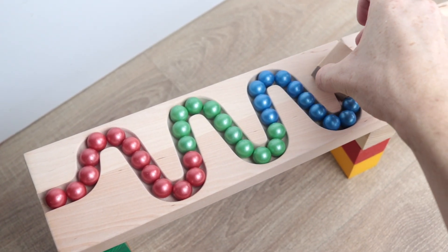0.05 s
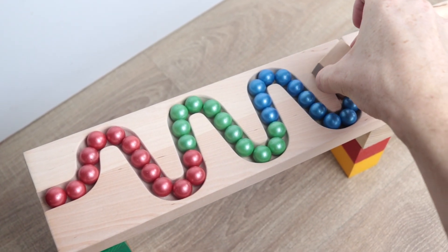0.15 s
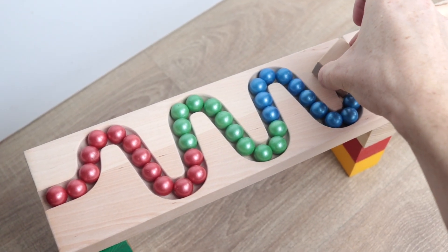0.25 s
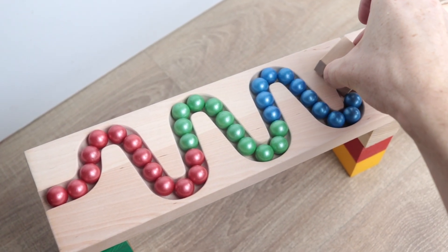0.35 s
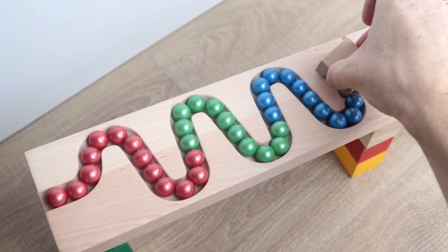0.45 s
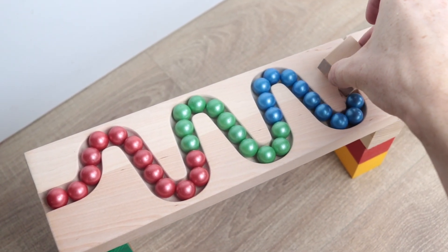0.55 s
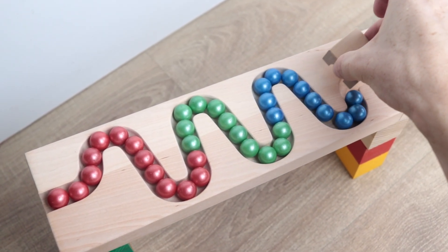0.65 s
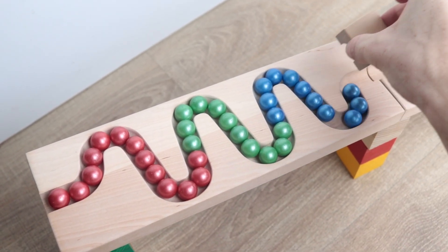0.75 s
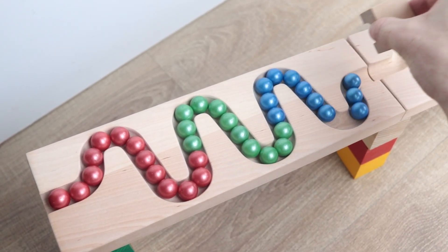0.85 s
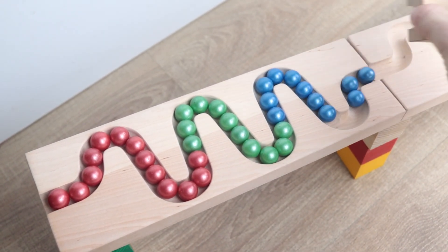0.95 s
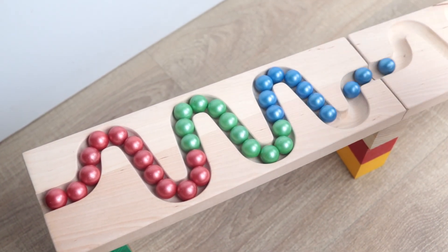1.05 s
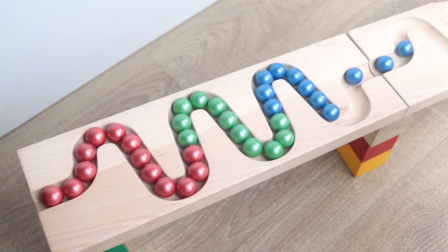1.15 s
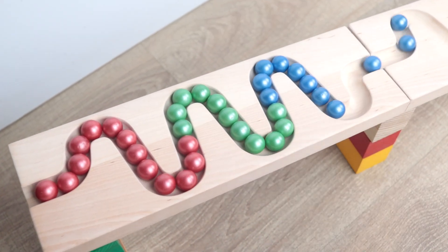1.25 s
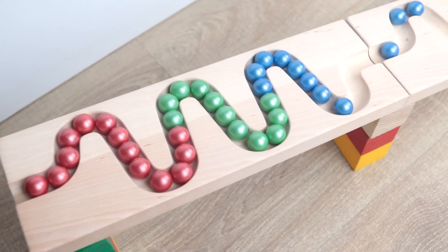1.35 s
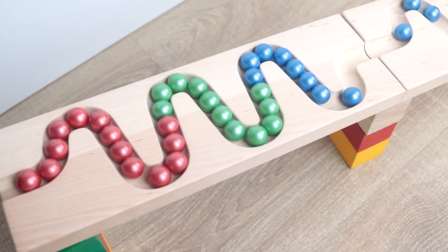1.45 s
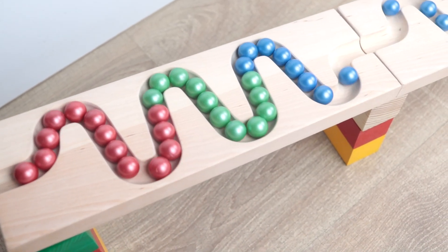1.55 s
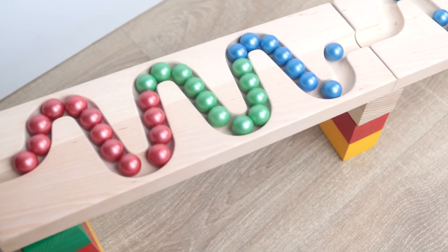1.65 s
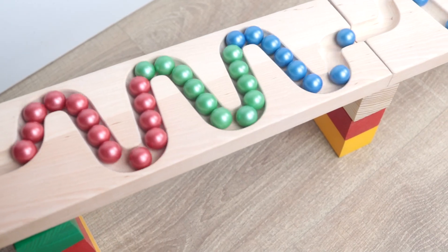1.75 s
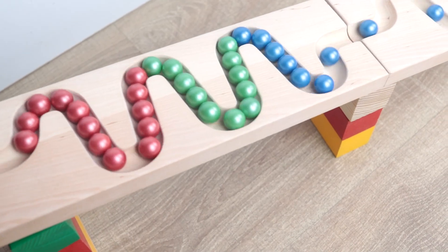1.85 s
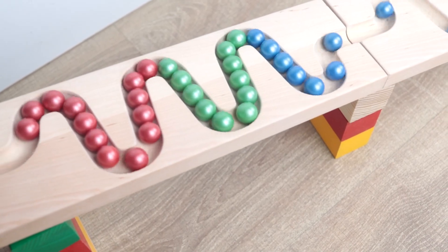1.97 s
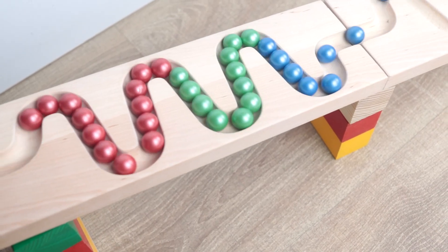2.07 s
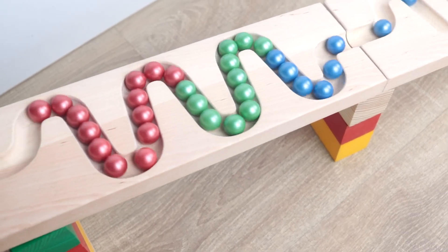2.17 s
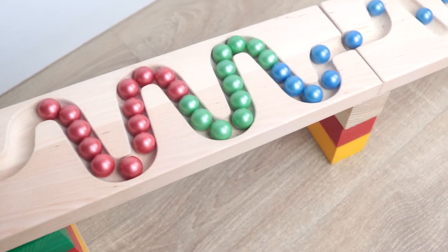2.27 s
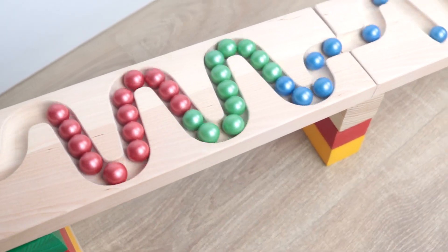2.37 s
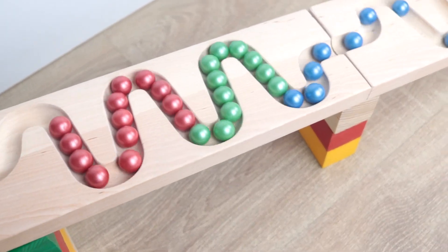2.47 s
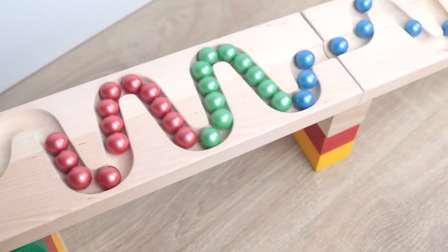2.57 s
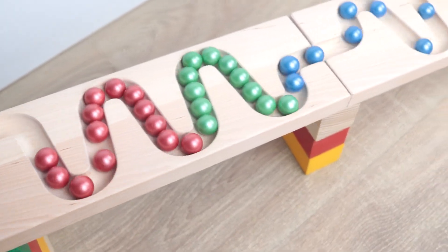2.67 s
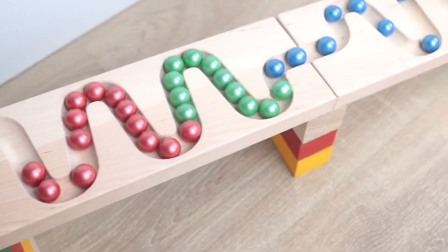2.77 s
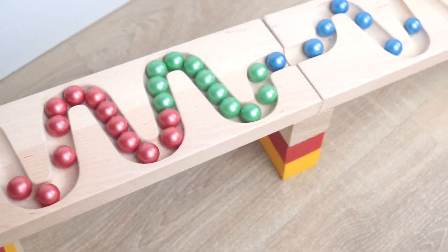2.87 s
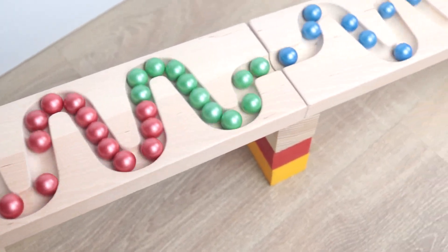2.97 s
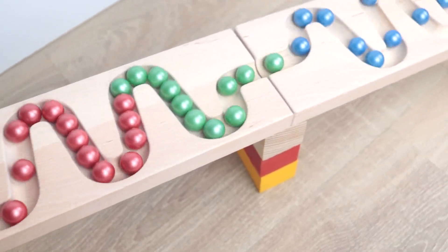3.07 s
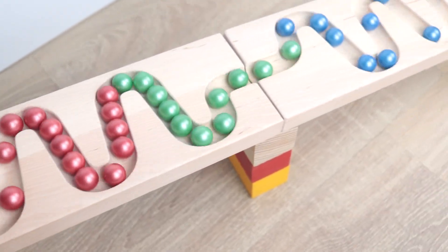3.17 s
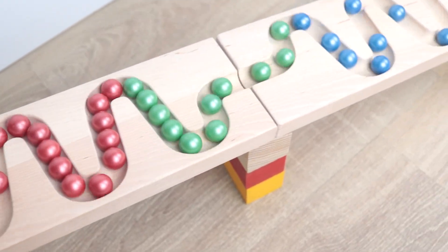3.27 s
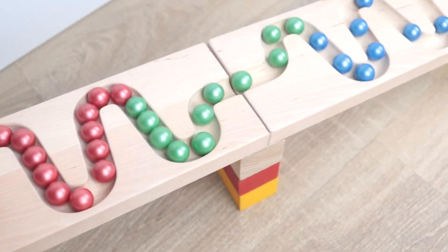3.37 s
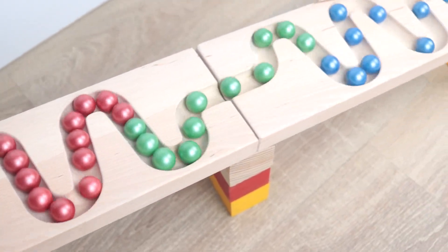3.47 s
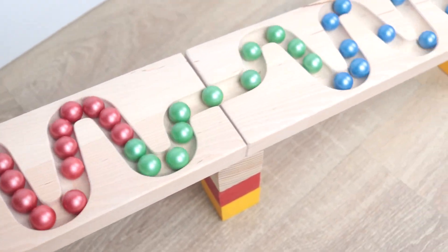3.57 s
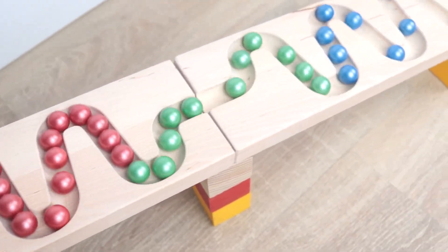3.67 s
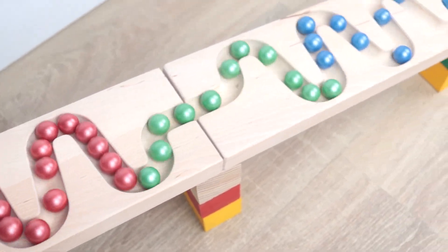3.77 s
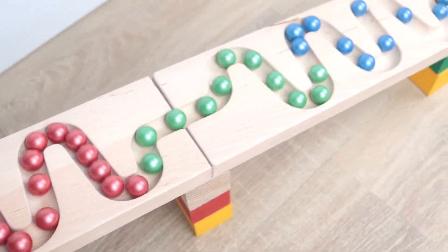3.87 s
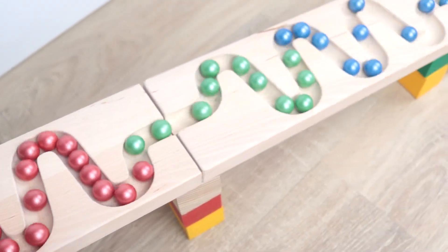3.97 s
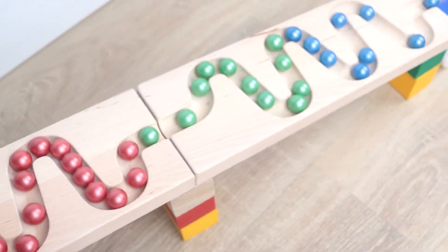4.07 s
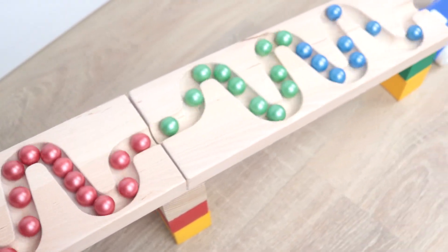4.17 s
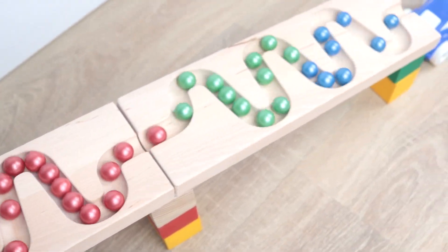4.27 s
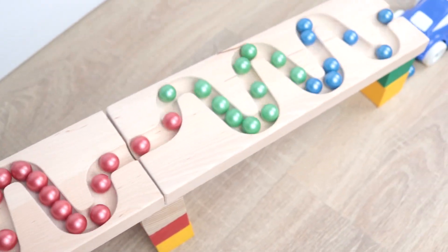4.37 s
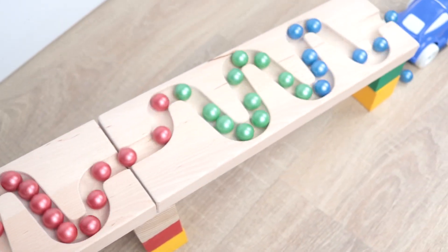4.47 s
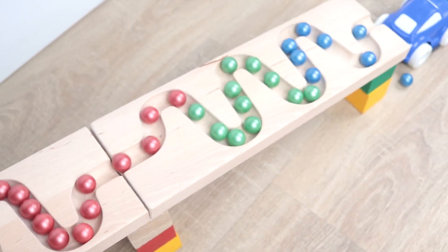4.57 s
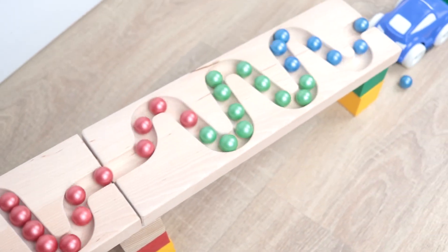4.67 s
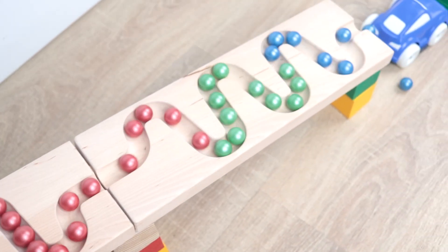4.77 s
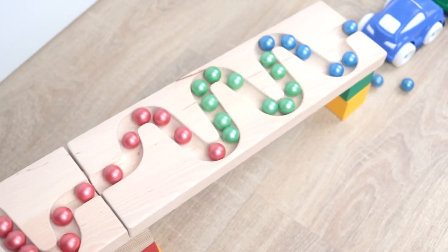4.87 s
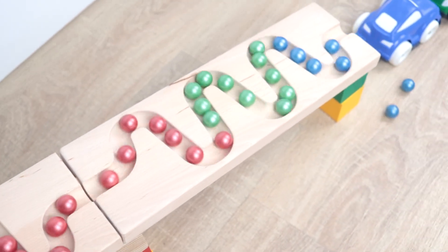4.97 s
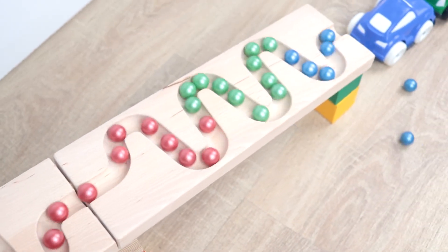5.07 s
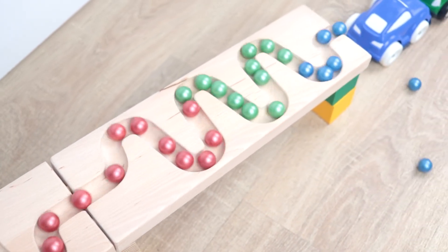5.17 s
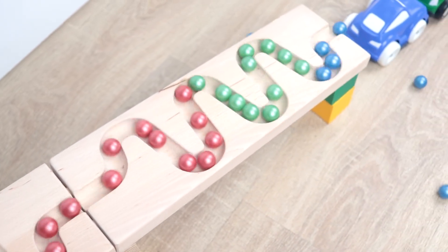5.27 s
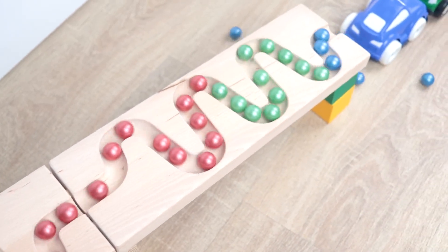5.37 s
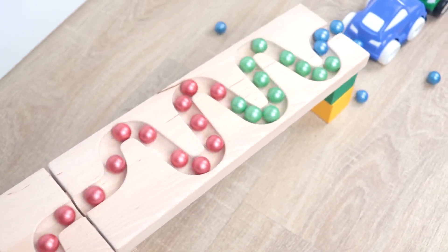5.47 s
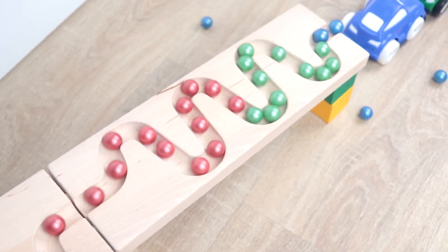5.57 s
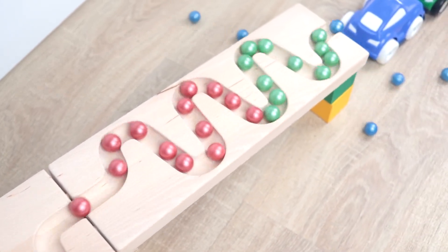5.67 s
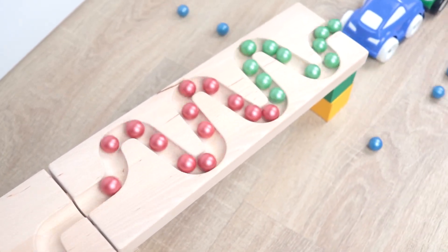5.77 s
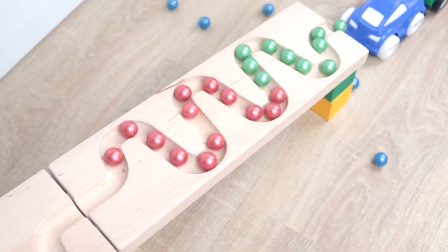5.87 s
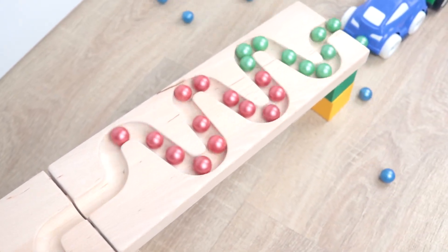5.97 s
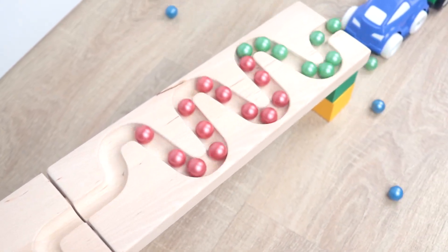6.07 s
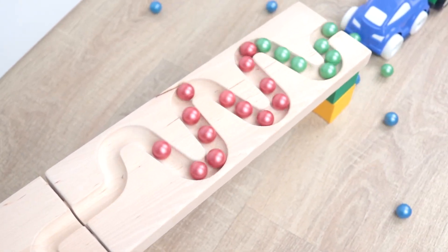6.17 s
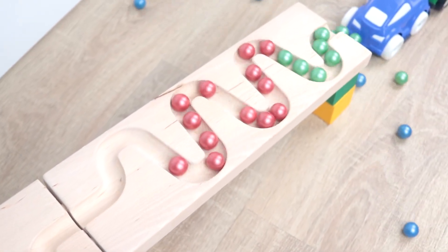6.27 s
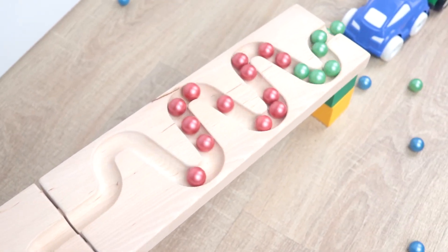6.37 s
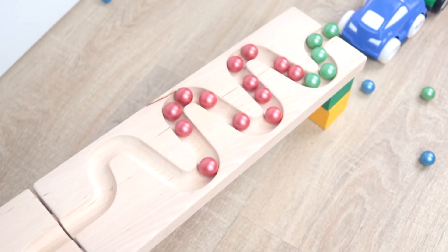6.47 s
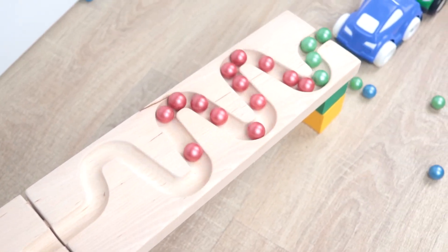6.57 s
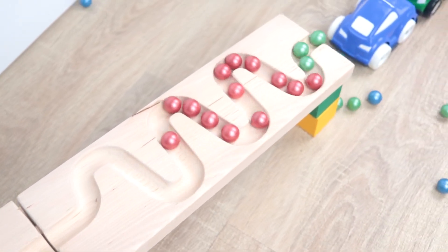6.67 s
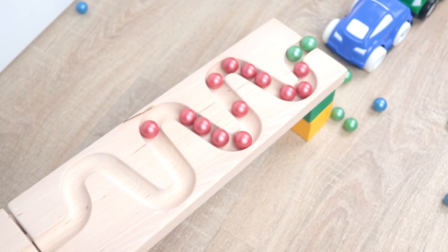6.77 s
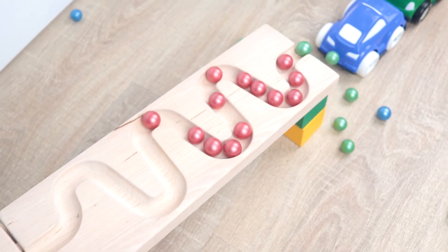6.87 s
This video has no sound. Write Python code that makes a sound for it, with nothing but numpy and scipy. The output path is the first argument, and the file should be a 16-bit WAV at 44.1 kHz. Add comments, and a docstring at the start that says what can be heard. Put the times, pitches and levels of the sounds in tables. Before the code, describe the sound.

Glass marbles roll, knock and click down a wooden track, then hit a plastic toy car and bounce across a laminate floor.

```python
"""Marbles on a wooden track

Glass marbles roll down a winding groove in a board, knocking its walls and clicking on each other.
They drop off the end against a hollow plastic toy car and onto a laminate floor, bounce and roll away.
A quiet room hums behind; the close stereo microphone overloads on the hardest landings."""
import sys
import numpy as np
from scipy import signal
from scipy.fft import rfft, irfft, next_fast_len
from scipy.io import wavfile

SR = 44100
rng = np.random.default_rng(int(sys.argv[2]) if len(sys.argv) > 2 else 0)


def waveform_to_disk(signal):
    """Save audio, clipped to [-1, 1], as 16-bit WAV at the path in sys.argv[1]."""
    frames = np.transpose(np.atleast_2d(signal))
    scaled = np.clip(frames, -1, 1) * 32767
    samples = np.round(scaled).astype(np.int16)
    wavfile.write(sys.argv[1], SR, samples)


N = 305613
SPILL_S = (3.98, 4.16)  # marbles start to leave the board

# board resonances: pitch_hz, level_db, t60_s
BOARD_MODES = [(560, -14, .03), (940, -14, .03), (1390, -12, .03), (1480, 0, .07), (1550, -9, .04),
               (1688, -1, .07), (1900, -12, .025), (2420, -8, .045), (2600, 0, .05), (3035, -3, .04),
               (3640, -3, .05), (3880, -7, .03)]
# blows on the groove walls: start_s, level_db, low_modes_db, high_modes_db
WALL_KNOCKS = [(0.8388, -30, 22.5, -34), (0.967, -18.5, -0.5, -27), (1.1041, -10, 4, -17),
               (1.2192, -10, 3, -25), (1.3557, -9, -17, -18), (1.4556, -4.5, -39, -7),
               (1.5431, -16.5, -11, -23), (1.561, -5.5, -25, -17), (1.6694, -6, -23, -18),
               (1.7138, -15, 8, -10), (1.7355, -8.5, -20, 1), (1.7882, -17, 14, -30),
               (1.8935, -13.5, 4, -24), (1.9291, -5.5, -11, -18), (2.1138, -48, 0, -21),
               (2.131, -6, -20, -16), (2.1706, -5, -19, -19), (2.495, -30, 13, -14), (2.5206, -6.5, 5, -13),
               (2.6424, -8.5, -13, -14), (2.6644, -16, -29, -11), (2.699, -32, -10, -25),
               (2.7563, -7.5, -14, -18), (2.8003, -28, 1, -18), (2.8377, -14, -4, -19),
               (2.8805, -6, -25, -5), (2.9376, -6, -23, -6), (2.9759, -17, -4, -21),
               (2.9978, -7.5, -3, -24), (3.0278, -14, -16, -26), (3.0547, -11, -7, -26),
               (3.126, -7.5, 2, -19), (3.1862, -8, -22, -5), (3.2622, -4, -28, -23),
               (3.365, -7.5, -27, -14), (3.4199, -8.5, -23, -13), (3.4766, -7.5, -7, -21),
               (3.5284, -19, 5, -15), (3.5623, -5, -17, -2), (3.6853, -20, -3, -20), (3.7043, -4.5, 7, -20),
               (3.819, -8, 12, -25), (3.8743, -10.5, 5, -25), (3.9048, -18, 4, -21), (3.9202, -9, -9, -20),
               (3.9666, -7, -21, -9), (3.9906, -6.5, -9, -9), (4.0564, -2.5, -13, -13),
               (4.1128, -8, 3, -26), (4.2138, -7, 8, -11), (4.2542, -0.5, -23, -4)]
# first soft taps: start_s, level_db
SOFT_TAPS = [(0.813, -35.5), (0.893, -31), (0.927, -32.5)]


def wall_knocks(clack, deep_db=-21.5, middle_db=-9.5):
    """A knock rings the board with a toneless clack; soft taps ring only its two deepest modes."""
    out, t = np.zeros((2, N)), times(0.1)
    mode_hz = np.transpose(BOARD_MODES)[0][:, None]
    for start_s, db, low_db, high_db in WALL_KNOCKS:
        tilt = [(1000, deep_db), (1350, low_db), (1700, low_db), (2500, middle_db), (3000, high_db)]
        modes = ring(BOARD_MODES, along(tilt, mode_hz), scatter_db=5.5, attack_s=0.0005)
        burst = excerpt(clack, t) * rise(t, 0.00085) * decay(t, 0.02)
        add(out, start_s, amp(db - 3) * modes + amp(db - 4) * burst)
    for start_s, db in SOFT_TAPS:
        add(out, start_s, amp(db) * ring(BOARD_MODES[:2], 0, scatter_db=3, attack_s=0.0015))
    return out


# marble on marble: start_s, level_db
GLASS_CLICKS = [(0.1703, -32.5), (1.062, -16), (1.2068, -36.5), (1.4408, -31.5), (1.7106, -34),
                (1.718, -25), (1.8309, -36), (1.9066, -12), (1.9676, -24), (2.005, -18), (2.1123, -40),
                (2.1572, -22.5), (2.189, -12.5), (2.295, -25), (2.3348, -10.5), (2.4662, -16.5),
                (2.504, -25), (2.6001, -46), (2.6291, -27), (2.6775, -20), (2.8073, -15.5), (2.8536, -16.5),
                (2.8865, -26), (2.9035, -13), (2.9837, -22), (3.0092, -18), (3.0816, -21.5), (3.1155, -30),
                (3.167, -21.5), (3.2225, -15), (3.298, -23.5), (3.3637, -12), (3.3973, -25), (3.4647, -49),
                (3.505, -24), (3.6485, -12), (3.781, -24.5), (3.822, -30), (3.8614, -15), (3.9046, -18),
                (3.992, -23), (4.0493, -19), (4.0649, -13.5), (4.1142, -26), (4.1965, -11), (4.2534, -17)]
# glass contact noise: freq_hz, density_db
GLASS_SPECTRUM = [(3500, -17.5), (5000, -5.5), (7300, 2.5), (9000, -8), (12000, -27.5), (16000, -56)]
# jostling hiss: time_s, level_db
JOSTLE_LEVELS = [(1.2, -71), (2.1, -44), (2.8, -37), (3.9, -45.5), (4.6, -42)]


def glass_clicks():
    """Glass barely rings: short ticks, each with an echo along the groove, over a hiss of jostling."""
    out, t = np.zeros((2, N)), times(1 / 15)
    glass = coloured_noise(GLASS_SPECTRUM)
    for start_s, db in GLASS_CLICKS:
        pitch_hz = 7200 * amp(rng.normal(0, .6))
        tick = np.sin(2 * np.pi * pitch_hz * t) * rise(t, .0002) * decay(t, .003)
        echo = excerpt(glass, t) * decay(t, 0.036)
        add(out, start_s, amp(db + 1) * tick + amp(db - 4) * echo)
    jostle_db, = curves(JOSTLE_LEVELS)
    return out + amp(jostle_db) * glass * contacts(rate_hz=70, spread_db=6.5, t60_s=0.021, steady=0.076)


# marbles in the groove: time_s, rumble_db, rattle_db
ROLL_LEVELS = [(0.7, -79, -84), (0.85, -63, -94), (1.05, -40.5, -60), (1.2, -38, -46.5), (1.38, -36.5, -32),
               (1.58, -37, -38.5), (2.02, -34, -35.5), (2.45, -30.5, -25.5), (3.11, -28.5, -25.5),
               (3.81, -27.5, -23), (3.93, -28, -28), (4.36, -35, -30), (4.95, -32, -20), (5.11, -34.5, -29),
               (5.73, -38.5, -27), (6.2, -37, -40), (6.49, -36, -33.5), (6.93, -40, -40)]
# rumble of the loaded board: freq_hz, density_db
LOADED_SPECTRUM = [(88, -62), (150, -24.5), (412, -8.5), (463, -5.5), (548, 0), (666, -2.5), (958, -4),
                   (1250, -9), (1620, -4), (2750, -120)]
# rumble under a lighter load: freq_hz, density_db
LIGHT_SPECTRUM = [(150, -42), (380, -20.5), (450, -5), (500, -0.5), (600, -3.5), (1000, -4.5), (1620, -7),
                  (2750, -60)]


def groove_rolling(clack, rattle):
    """Rolling marbles rumble the board and rattle between the walls, more after each knock."""
    rumble_db, rattle_db = curves(ROLL_LEVELS)
    fade_rad = ramp(SPILL_S, [0, np.pi / 2])
    rumble = np.cos(fade_rad) * coloured_noise(LOADED_SPECTRUM)
    rumble += np.sin(fade_rad) * coloured_noise(LIGHT_SPECTRUM)
    rumble *= contacts(rate_hz=130, spread_db=-1, t60_s=0.079, steady=0.52)
    chatter = clack * contacts(rate_hz=140, spread_db=4, t60_s=0.076, steady=0.06)
    ringing_db = ramp([4.24, 4.3], [3, -12])  # fades as the marbles move on
    activity = amp(rattle_db) + amp(-16.5) * aftermath(WALL_KNOCKS, t60_s=0.14)
    return amp(rumble_db + 3) * rumble + activity * (amp(ringing_db) * rattle + amp(-3) * chatter)


def board_rattle():
    """Countless small contacts keep the board's upper modes ringing; rms 1."""
    drive = stereo_noise(lambda hz: hz > 900)
    drive *= contacts(rate_hz=81, spread_db=-0.5, t60_s=0.0089, steady=0.18)
    modes = resonator(BOARD_MODES[3:], widen=2.8)
    tilt = [(1300, -12), (1470, 0), (1700, -2), (1850, -10), (2600, -8), (4000, -15)]
    return unit_rms(filtered(drive, lambda hz: modes(hz) * amp(along(tilt, hz))))


# laminate resonances: pitch_hz, level_db, t60_s
FLOOR_MODES = [(605, -4, 0.052), (1004, 13, 0.026), (1467, 9, 0.039), (1922, 12, 0.029),
               (2035, 14.5, 0.027), (2770, -4.5, 0.0087), (3210, 3.5, 0.031), (3476, 5.5, 0.044),
               (3930, 14, 0.013), (4190, 4.5, 0.0093), (4540, -4, 0.015), (6020, -47, 0.016),
               (5720, 4, 0.0067), (8214, 7.5, 0.031), (11200, -29, .01)]
# landings and bounces: start_s, level_db, treble_db
FLOOR_LANDINGS = [(4.2535, -2.5, -14), (4.2866, -11, -16), (4.3216, -14, -32), (4.419, -7, -14.5),
                  (4.4455, -12.5, -20), (4.5036, -11, -27), (4.5415, -14.5, -32), (4.57, -14, -29),
                  (4.595, -11.5, -41), (4.6768, -11, -14), (4.719, -10.5, -28), (4.9143, -10, -25),
                  (4.9378, 1, -18), (4.9504, -6.5, -45), (4.9975, -12.5, -24), (5.035, -13.5, -39),
                  (5.0601, -10.5, -36), (5.1225, 1.5, -12.5), (5.242, -2.5, -23), (5.2997, -10.5, -27),
                  (5.3357, -12.5, -25), (5.3852, 1, -13.5), (5.4067, -10.5, -35), (5.4837, -2.5, -14.5),
                  (5.5615, -12, -22), (5.6493, -2.5, -16.5), (5.687, -8, -15.5), (5.7049, -14, -18),
                  (5.7802, -7.5, -22), (5.7928, -6, -15), (5.8376, -18, -16), (5.879, -17.5, -10),
                  (5.89, -11.5, -21), (5.908, -8.5, -23), (5.9318, -10.5, -27), (5.9778, -10, -22),
                  (6.0007, -4, -16.5), (6.0674, -5.5, -15.5), (6.1428, -11.5, -20), (6.1845, -7, -22),
                  (6.2058, -5.5, -18.5), (6.267, -15.5, -26), (6.3121, -2.5, -19.5), (6.4078, -7.5, -16),
                  (6.4412, -4.5, -18), (6.4975, -19.5, -19), (6.5194, -17, -19), (6.54, -12, -18),
                  (6.5688, -3, -15), (6.6005, -12, -15), (6.6242, -12.5, -30), (6.6648, -15, -24),
                  (6.6979, -4.5, -12.5), (6.8057, -5.5, -16.5), (6.8623, -22.5, -28), (6.9038, -4, -18)]
# toneless body of a landing: freq_hz, density_db
LANDING_SPECTRUM = [(200, -88), (500, 5.5), (1500, 5), (3500, 9), (4700, 10), (6500, -1), (10000, -15),
                    (16000, -50)]


def floor_landings(snap, low_db=-8.5):
    """Each landing rings the laminate, with a noisy body and a bright crack."""
    out, t = np.zeros((2, N)), times(0.1)
    mode_hz = np.transpose(FLOOR_MODES)[0][:, None]
    body_noise = coloured_noise(LANDING_SPECTRUM)
    for start_s, db, treble_db in FLOOR_LANDINGS:
        tilt = [(2200, low_db), (2600, 0), (6000, 0), (6800, treble_db + 1.5)]
        modes = amp(-2.5) * ring(FLOOR_MODES, along(tilt, mode_hz), scatter_db=3, attack_s=0.00044)
        body = amp(-3.5) * excerpt(body_noise, t) * decay(t, 0.022)
        crack = amp(treble_db + 5) * excerpt(snap, t) * decay(t, 0.023)
        add(out, start_s, amp(db + 5) * (modes + (body + crack) * rise(t, 0.001)))
    return out


# blows on the toy car: start_s, level_db, pitch_hz, treble_db
CAR_HITS = [(3.99, -5.5, 1020, -8.5), (4.114, -6.5, 1170, -12), (4.255, -8, 1310, -13.5),
            (4.652, -8, 1352, -11.5)]


def car_hits(snap):
    """The hollow plastic shell snaps and rings briefly in three modes."""
    out, t = np.zeros((2, N)), times(0.1)
    for start_s, db, pitch_hz, treble_db in CAR_HITS:
        modes = [(pitch_hz, 0, .03), (1.257 * pitch_hz, -4, .025), (0.609 * pitch_hz, -9, .03)]
        crack = amp(treble_db - 4.5) * excerpt(snap, t) * rise(t, 0.001) * decay(t, 0.063)
        shell = ring(modes, 0, scatter_db=-2.5, attack_s=0.00072)
        add(out, start_s, amp(db + 5.5) * (shell + crack))
    return out


def thumps(level_db=-18, db_per_db=4.1, peak_s=0.00094):
    """A short low push that grows much faster than the blow, so only hard ones carry it."""
    out, t = np.zeros(N), times(0.05)
    push = -t / peak_s * np.exp(1 - t / peak_s)
    for start_s, db, *_ in FLOOR_LANDINGS + CAR_HITS:
        add(out, start_s, amp(db_per_db * db + level_db) * push)
    return out


# marbles loose on the laminate: freq_hz, density_db
LOOSE_SPECTRUM = [(710, -63), (1200, -21), (1280, -10.5), (1630, -9), (2060, -7.5), (2420, -15.5),
                  (2630, -4.5), (4110, -4.5), (4820, -8), (9000, -37.5), (11700, -55), (19800, -120)]


def floor_rolling(stray_db=-27, spilled_db=-30):
    """Loose marbles roll, faintly until the spill, and skitter after each landing."""
    rolling = coloured_noise(LOOSE_SPECTRUM)
    rolling *= contacts(rate_hz=84, spread_db=5, t60_s=0.034, steady=0.39)
    rumble_db, _ = curves(ROLL_LEVELS)
    spilled = ramp(SPILL_S, [0, 1])
    level_db = (1 - spilled) * (rumble_db + stray_db) + spilled * spilled_db
    return (amp(level_db) + amp(-19) * aftermath(FLOOR_LANDINGS, t60_s=0.14)) * rolling


def handling_rumble(pitch_hz=290):
    """A brief low handling rumble swells and fades."""
    rumble = stereo_noise(resonator([(pitch_hz, 0, .012)], widen=0.69))
    return amp(-35.5) * rumble * swell(centre_s=2.27, half_s=.07)


def finger_scrape(clack, rattle):
    """A finger drags faintly on the wood before the release."""
    return amp(-53) * (rattle + 0.41 * clack) * swell(centre_s=.34, half_s=0.068)


def wall_echoes(x):
    """A nearby wall throws each blow back, in two cascaded delays."""
    for delay_s, db in [(.0065, -8), (.013, -16)]:
        add(x, delay_s, amp(db) * x)
    return x


# left channel over right: freq_hz, level_db
MIC_BALANCE = [(500, 0.5), (3000, -0.9), (12000, 0.5)]


def microphone_ports(x, lag_s):
    """The left port lies a little farther from the track; the balance varies with frequency."""
    side = np.array([[1], [-1]]) / 2
    delay = lambda hz: np.exp(-2j * np.pi * hz * lag_s * side)
    return filtered(x, lambda hz: delay(hz) * amp(along(MIC_BALANCE, hz) * side))


# room decay: freq_hz, t60_s
ROOM_DECAY = [(200, 0.3), (2000, 0.17), (10000, 0.39)]


def room(x, level_db=-12, step_s=.3):
    """Adds a short tail, shortest in the mids, drawn anew every step_s so no fixed colour builds up."""
    out, step = x.copy(), int(step_s * SR)
    for start in range(0, N, step):
        hz, t, spectra = signal.stft(rng.standard_normal((2, SR // 3)), SR, nperseg=256)
        tail = signal.istft(spectra * decay(t, along(ROOM_DECAY, hz)[:, None]), SR, nperseg=256)[1]
        tail[1] = .9 * tail[0] + .4 * tail[1]  # partly alike at both ports
        tail *= amp(level_db) / np.linalg.norm(tail[0])
        add(out, start / SR, signal.fftconvolve(x[:, start:start + step], tail, axes=1))
    return out


# room air: freq_hz, density_db
AIR_SPECTRUM = [(76, -30), (130, -11), (219, -7), (285, -6), (328, 3.5), (370, -10), (794, -12.5),
                (1120, -8.5), (1240, -27), (1540, -15.5), (15900, -32)]


def room_hum(jolt_hz=45):
    """Steady room air, a low shaking that dies down, and one low jolt."""
    shake = coloured_noise([(15, -14), (30, -15), (68, 27.5), (130, 12.5), (260, -39.5)])
    shake_db = ramp([3.6, 4.2], [-58, -98])
    jolt = swell(centre_s=2.86, half_s=.05) * np.sin(2 * np.pi * jolt_hz * np.arange(N) / SR)
    return amp(-54) * coloured_noise(AIR_SPECTRUM) + amp(shake_db) * shake + amp(-49) * jolt


# left-right likeness of noise: freq_hz, correlation
PORT_CORRELATION = [(100, .97), (700, .85), (1500, .5), (3000, .35), (10000, .35)]


def stereo_noise(response):
    """Noise of rms 1 with a given response, alike at both ports in the bass."""
    def mid_side(hz):
        angle = np.arccos(np.clip(along(PORT_CORRELATION, hz), -1, 1)) / 2
        return response(hz) * [np.cos(angle), np.sin(angle)]
    mid, side = filtered(rng.standard_normal((2, N)), mid_side)
    return unit_rms(np.array([mid + side, mid - side]))


def coloured_noise(spectrum):
    """Stereo noise from (freq_hz, density_db) points."""
    return stereo_noise(lambda hz: amp(along(spectrum, hz)))


def ring(modes, gain_db, scatter_db, attack_s):
    """One blow of peak 1: mode strengths vary with the spot struck and reach the ports unevenly."""
    hz, db, t60_s = np.transpose(modes)[..., None]
    t = times(0.1)
    spot, detune, pan, phase = rng.standard_normal((4, len(modes), 1))
    width = np.array([1, -1])[:, None, None] * np.minimum(hz / 2600, 1.1)
    level = amp(db + gain_db + scatter_db * spot + 3.8 * width * pan) * decay(t, t60_s)
    partials = level * np.sin(2 * np.pi * hz * (1 + .003 * detune) * t + .5 * width * phase)
    blow = partials.sum(axis=1) * rise(t, attack_s)
    return blow / np.abs(blow).max()


def resonator(modes, widen):
    """Causal response of modes of alternating sign, each widen / t60_s hertz wide."""
    def band(hz, pitch_hz, t60_s):
        damping = 1j * hz * widen / t60_s
        return damping / (pitch_hz ** 2 - hz ** 2 + damping)
    return lambda hz: sum((-1) ** k * amp(db) * band(hz, pitch_hz, t60_s)
                          for k, (pitch_hz, db, t60_s) in enumerate(modes))


def contacts(rate_hz, spread_db, t60_s, steady):
    """Envelope of many small contacts of uneven size over a steady share; rms 1."""
    sizes = amp(spread_db * np.clip(rng.standard_normal(N), -2, 2))
    hits = (rng.random(N) < rate_hz / SR) * sizes
    t = times(0.1)
    power = signal.fftconvolve(hits ** 2, (rise(t, 0.0012) * decay(t, t60_s)) ** 2)[:N]
    return np.sqrt((np.abs(power) / np.mean(power) + steady) / (1 + steady))


def aftermath(blows, t60_s):
    """Envelope that jumps with each blow and dies away."""
    energy, t = np.zeros(N), times(0.5)
    for start_s, db, *_ in blows:
        energy[round(start_s * SR)] = amp(db) ** 2
    power = signal.fftconvolve(energy, rise(t, 0.0047) * decay(t, t60_s) ** 2)[:N]
    return np.sqrt(np.abs(power))


def amp(db):
    return 10 ** (np.asarray(db) / 20)


def unit_rms(x):
    return x / np.sqrt(np.mean(x ** 2) + 1e-20)


def times(length_s):
    return np.arange(round(length_s * SR)) / SR


def rise(t, attack_s):
    return 1 - np.exp(-t / attack_s)


def decay(t, t60_s):
    return amp(-60 * t / t60_s)


def swell(centre_s, half_s):
    return np.exp(-((np.arange(N) / SR - centre_s) / half_s) ** 2)


def ramp(times_s, values):
    return np.interp(np.arange(N) / SR, times_s, values)


def curves(rows):
    """One value per sample for each column after time_s."""
    times_s, *columns = np.transpose(rows)
    return [ramp(times_s, column) for column in columns]


def along(points, hz):
    """Interpolates (freq_hz, value) points on a log axis."""
    freq_hz, values = np.transpose(points)
    return np.interp(np.log(hz + 1), np.log(freq_hz + 1), values)


def filtered(x, response):
    size = next_fast_len(N + SR // 2)
    return irfft(rfft(x, size) * response(np.fft.rfftfreq(size, 1 / SR)), size)[..., :N]


def excerpt(noise, t):
    return noise[:, rng.integers(N - len(t)):][:, :len(t)]


def add(track, start_s, sound):
    span = track[..., round(start_s * SR):][..., :sound.shape[-1]]
    span += sound[..., :span.shape[-1]]


def scene():
    """Board and floor sound through the room; thumps and hum stay dry."""
    clack = coloured_noise([(500, -14), (1200, 6.5), (2500, 5.5), (3900, -9.5), (5200, -11.5),
                            (9000, -37)])
    rattle = board_rattle()
    board = wall_knocks(clack) + glass_clicks() + groove_rolling(clack, rattle)
    handling = handling_rumble() + finger_scrape(clack, rattle)
    snap = coloured_noise([(3000, -9.5), (6000, 9.5), (11500, -4), (16000, -11)])
    floor = wall_echoes(floor_landings(snap) + car_hits(snap)) + floor_rolling()
    return room(microphone_ports(board + handling + floor, lag_s=.00007)) + thumps() + room_hum()


def record(dry):
    """The input clips softly at full scale, then is band-limited."""
    top_hz = 16050
    clipped = dry / (1 + np.abs(dry) ** 8) ** (1 / 8)
    return np.clip(filtered(clipped, lambda hz: hz < top_hz), -1, 1)


dry = scene()
out = record(dry)
waveform_to_disk(out)
```